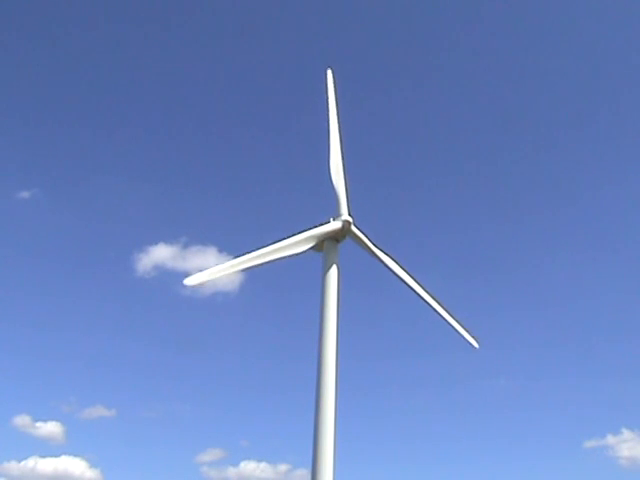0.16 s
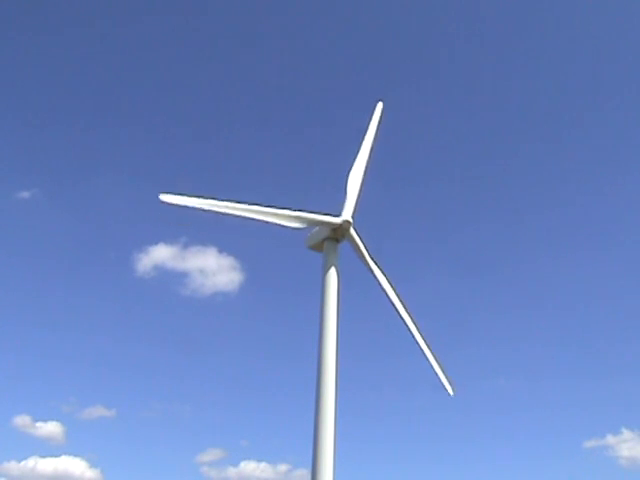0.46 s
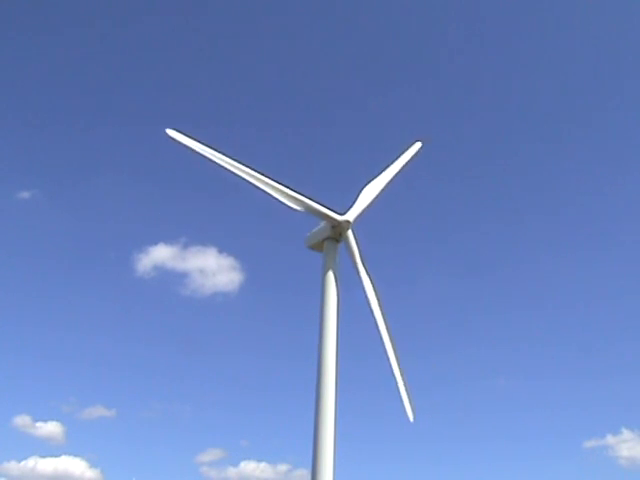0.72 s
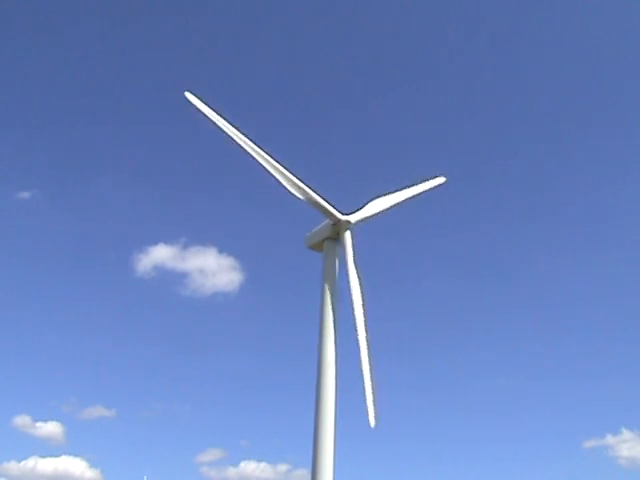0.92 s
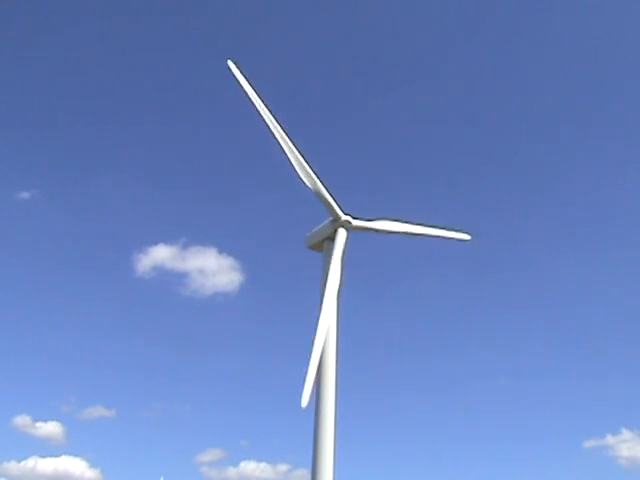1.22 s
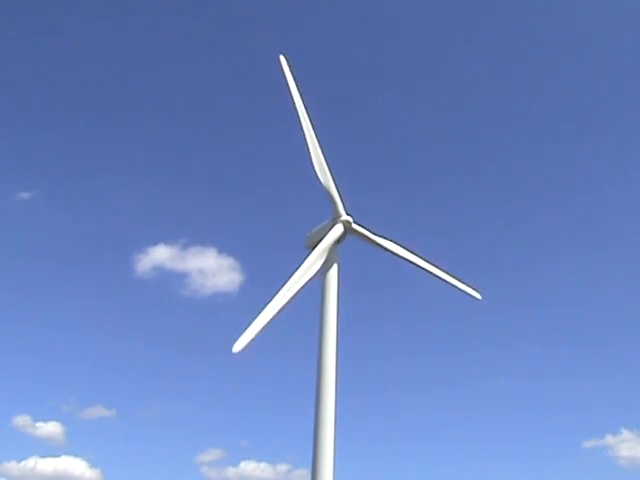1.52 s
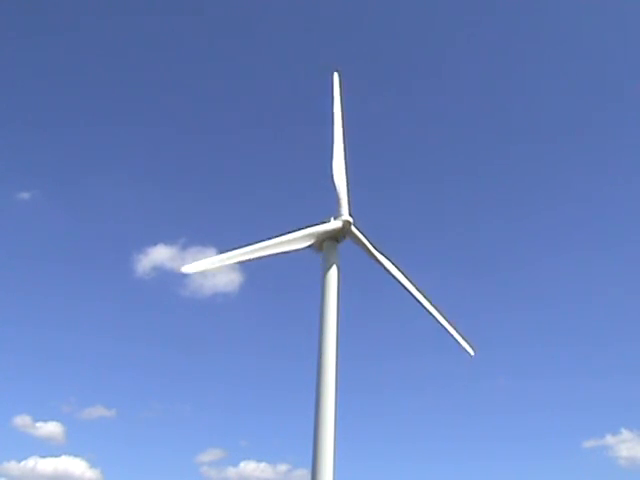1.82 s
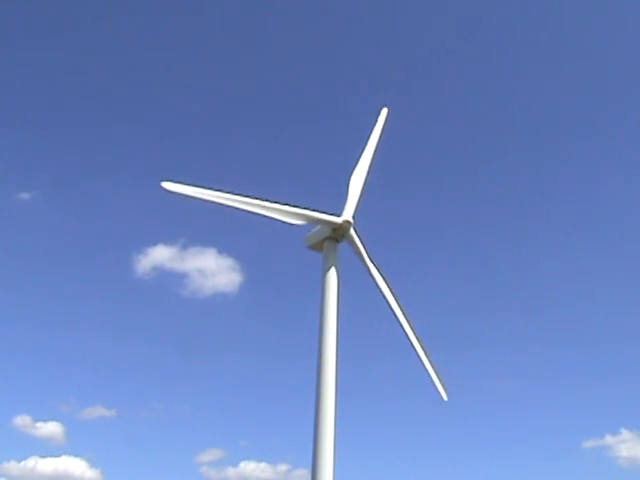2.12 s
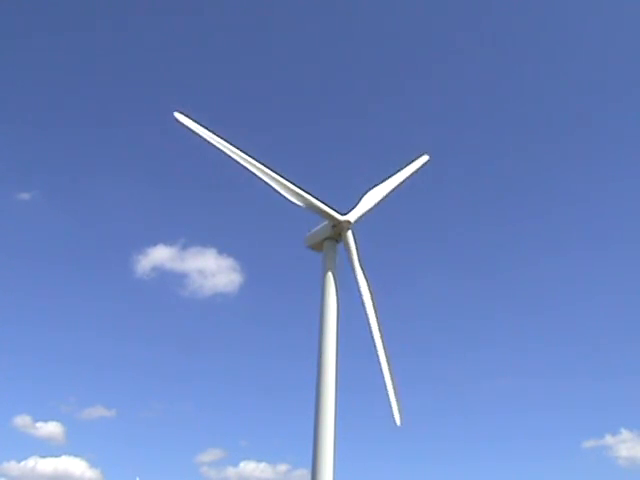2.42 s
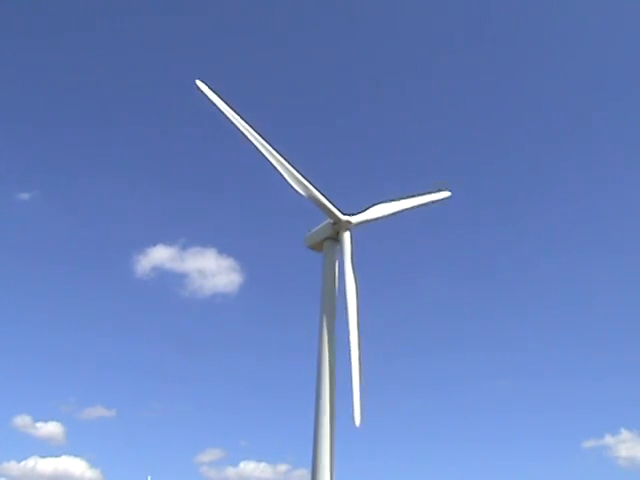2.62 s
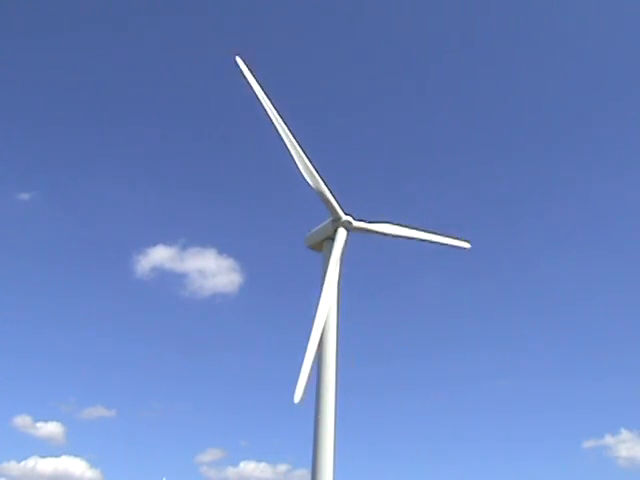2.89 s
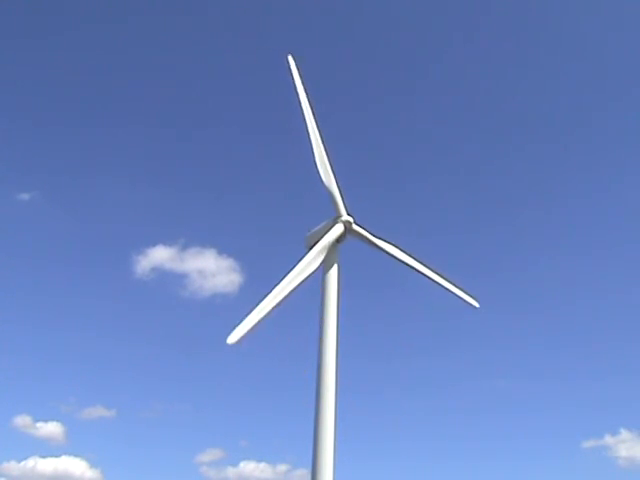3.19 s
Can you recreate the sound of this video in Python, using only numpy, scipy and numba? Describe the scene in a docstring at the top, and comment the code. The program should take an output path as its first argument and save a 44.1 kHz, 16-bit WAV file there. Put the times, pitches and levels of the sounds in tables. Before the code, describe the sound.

Wind rumbles and buffets a hand-held microphone outdoors, with sharp pops and faint bird twitters.

```python
"""Wind tumbles over a hand-held stereo microphone below a wind turbine: shaped noise rumbles, flutters,
buffets and throbs, and pressure spikes make sharp pops, one of them overloading.
A distant songbird twitters in gliding whistles, and a farther one holds a note as narrow-band noise.
Early on something close by rustles, probably clothing: grainy noise strokes and two small ticks.
Behind lie the turbine's noise rush and two steady tones, and microphone hiss with a thin electrical whine."""
import sys
import numpy as np
from scipy import signal
from scipy.fft import rfft, irfft
from scipy.io import wavfile
from scipy.ndimage import uniform_filter1d
from numba import njit

SR = 44100
rng = np.random.default_rng(int(sys.argv[2]) if len(sys.argv) > 2 else 0)


def dump(signal):
    """Clip the signal to [-1, 1] and save it as 16-bit WAV at the path in sys.argv[1]."""
    limited = np.clip(np.atleast_2d(signal).T, -1, 1)
    pcm = np.round(limited * 32767).astype(np.int16)
    wavfile.write(sys.argv[1], SR, pcm)


N = 147735  # samples

# Spectra are relative: each noise is brought to rms 1 before its level is set.
# A swell's reach is the time to each side of its centre over which it falls by a factor e^2.

# Strength of the wind's rumble and flutter, before their trims: columns t/s, level/dB
RUMBLE_LEVEL = [(0, -23.5), (.25, -32), (.7, -23.5), (1.12, -31), (1.45, -24), (2.2, -29.5), (2.65, -28.5),
                (3.0, -22), (3.35, -31)]
FLUTTER_LEVEL = [(0, -30.5), (.7, -28.5), (1.15, -31), (1.4, -27.5), (1.7, -30), (2.35, -24.5), (2.62, -33),
                 (2.78, -32), (3.0, -23.5), (3.35, -26)]
# Colours of the wind noises: columns f/Hz, level/dB (per Hz)
RUMBLE_SPECTRUM = [(15, -55), (28, -7.5), (45, -1.5), (72, 2), (170, -5), (280, -22), (600, -69)]
FLUTTER_SPECTRUM = [(60, -21.5), (130, -3), (240, -1.5), (330, -7), (450, -15.5), (700, -25.5), (1200, -38),
                    (2500, -49.5), (5000, -62)]
BUFFET_SPECTRUM = [(50, -3), (150, 1), (320, 8), (520, -2), (850, -11), (1500, -19), (2600, -31.5),
                   (8000, -64)]
# Eddies striking the ports: columns centre t/s, reach/s, level/dB
BUFFETS = [(0.694, 0.051, -20), (1.059, 0.017, -21), (1.407, 0.021, -22.5), (2.027, 0.059, -26),
           (2.341, 0.048, -19), (2.826, 0.0066, -16), (2.899, 0.09, -21.5), (2.983, 0.072, -13),
           (3.145, 0.029, -12.5), (3.223, 0.0045, -9.5)]
# Gusts that throb over the ports: columns centre t/s, reach/s, level/dB, vortex rate f/Hz
GUSTS = [(1.301, 0.021, -19, 184), (1.475, 0.17, -20, 119), (1.866, 0.1, -24, 53.6),
         (2.014, 0.047, -21, 272), (2.167, 0.089, -19, 164), (2.329, 0.1, -17, 223),
         (2.466, 0.036, -13, 98), (2.718, 0.007, -8, 133), (2.852, 0.034, -10.5, 88),
         (2.961, 0.18, -19.5, 243), (3.165, 0.079, -19, 87.6)]
# Sharp pops of wind on the ports: columns t/s, spike height before the rebound is taken off/dB
POPS = [(.332, -4), (0.4463, -8), (0.9033, -12), (1.528, -3.5), (1.8188, -5), (1.858, -5.5), (1.919, -4.5),
        (1.983, -11), (2.12, -6), (2.668, -6), (2.718, 5.5), (2.827, -5.5), (2.845, -7), (3.025, -4),
        (3.096, -5), (3.1715, -0.5)]
# Colour of the crack on the strongest pop: columns f/Hz, level/dB
CRACK_SPECTRUM = [(200, 0), (900, 0), (2000, -9), (4300, -23), (6000, -38), (16000, -49)]
# Bird notes: columns start t/s, length/s, start f/Hz, middle f/Hz, end f/Hz, level/dB
BIRD_NOTES = [(0, 0.024, 2230, 2230, 2090, -46.5), (.002, 0.031, 4180, 3750, 2440, -53),
              (0.142, 0.049, 2230, 2200, 2200, -49), (.397, 0.026, 2800, 2830, 3050, -51.5),
              (0.427, 0.022, 3920, 3800, 3400, -51.5), (0.48, 0.034, 3030, 2650, 2600, -56),
              (0.509, .042, 4080, 3930, 2970, -47.5), (0.622, 0.036, 4200, 3300, 2460, -51.5),
              (.722, 0.029, 4220, 3300, 2660, -51.5), (0.787, 0.075, 4580, 4870, 4670, -59.5),
              (.905, 0.025, 3640, 3620, 3350, -55), (0.998, 0.022, 3330, 3620, 3500, -49),
              (1.127, 0.069, 2245, 2500, 2890, -52), (1.197, 0.025, 3500, 3620, 3400, -57),
              (1.2, 0.081, 2230, 2760, 2920, -54.5), (1.221, 0.022, 5950, 5750, 5250, -54.5),
              (1.281, 0.043, 2310, 2330, 2190, -55.5), (1.632, 0.062, 2990, 2700, 2380, -50.5),
              (1.682, 0.026, 2540, 3050, 3360, -56), (1.793, 0.026, 4150, 3800, 3480, -56.5),
              (1.855, 0.032, 3620, 3630, 3300, -57.5), (1.859, 0.052, 2160, 2550, 3600, -57),
              (1.895, 0.041, 4330, 4430, 4830, -55), (1.938, 0.033, 4110, 3250, 2680, -53),
              (1.955, 0.025, 4000, 3830, 3150, -52.5), (2.039, .05, 3830, 3020, 2680, -52.5),
              (2.046, 0.05, 4270, 4130, 3620, -58), (2.067, .026, 3370, 3620, 3120, -55.5),
              (2.17, 0.031, 3500, 3580, 3020, -55.5), (2.244, 0.16, 2830, 2970, 2240, -48),
              (2.478, 0.044, 2930, 2860, 2360, -49), (3.057, .07, 4500, 4950, 4450, -59.5),
              (3.182, .036, 5050, 3900, 3200, -63), (3.33, 0.027, 4410, 4300, 4450, -55)]
# Cloth strokes: columns centre t/s, reach/s, broad hiss level/dB, ringing scuff level/dB, left over right/dB
CLOTH_STROKES = [(0.052, 0.47, -51.5, -60, 6.5), (0.187, 0.055, -62, -42, 0),
                 (0.326, 0.064, -57.5, -46, -1), (0.56, 0.18, -48, -58, 0.5), (0.945, 0.11, -55, -62, 3),
                 (1.098, 0.26, -48.5, -73, 1.5)]
# Colours of the cloth's hiss and scuff: columns f/Hz, level/dB (per Hz)
RUSTLE_SPECTRUM = [(1400, 1.5), (1800, -4.5), (2250, 2.5), (3000, -1.5), (4100, -1), (5100, -6),
                   (6200, -4.5), (8500, -11.5), (11000, -7.5), (16000, -19)]
SCUFF_SPECTRUM = [(1000, -23), (1400, 3.5), (1800, -15), (3200, -10), (3800, 3), (4300, -7), (5000, -19),
                  (6000, -15.5), (8500, -45)]
# Small ticks: columns t/s, level/dB, centre f/Hz, left over right/dB
TICKS = [(0.134, -30, 2300, 8), (0.669, -45, 8950, -1)]
# Two steady turbine tones, then a thin electrical whine in the microphone's hiss: columns f/Hz, level/dB
STEADY_TONES = [(512, -47.5), (1024, -56.5), (5922, -76), (11186, -82)]
# Colours of the turbine's rush and the microphone's hiss: columns f/Hz, level/dB (per Hz)
RUSH_SPECTRUM = [(100, 1), (450, -3.5), (800, -6), (1300, -14.5), (3000, -54)]
HISS_SPECTRUM = [(500, 4.5), (1500, 7), (3000, 2.5), (4500, -1.5), (6200, -4.5), (8700, -12.5),
                 (10700, -9.5), (13000, -19), (16000, -13)]

RUMBLE_TRIM_DB, FLUTTER_TRIM_DB = 5, 5.5
RUMBLE_PAN_DB, FLUTTER_PAN_DB = -5, 1.5  # left over right
EDDY_RATE_HZ, EDDY_DEPTH_DB = 23.3, 3.5
GUST_SKIRT_DB = -24  # an octave from the vortex rate
POP_RISE_S, POP_FALL_S = .0008, .0004
POP_REBOUND_S = 0.0022  # a shallow swing the other way surrounds each spike
CRACK_DB = -7.5

BIRD_WAVER = .004  # share by which the pitch wavers
BIRD_ECHO_DB, BIRD_ECHO_S, BIRD_PAN_DB = -14, 0.055, 3.5
TWITTER_START_S, TWITTER_END_S, TWITTER_NOTE_S = .87, 1.16, .016
TWITTER_HZ, TWITTER_SPREAD, TWITTER_DB = 3930, 0.148, -56.5  # spread: share by which the pitch varies
CALL_S, CALL_REACH_S, CALL_HZ, CALL_WIDTH_HZ, CALL_DB = 2.98, 0.16, 2810, 500, -56

TICK_DECAY_S = 0.0023
RUSH_DB, HISS_DB = -41.5, -53.5
TONE_WAVER_DB, TONE_DRIFT_RAD = 0.5, 1.93

# wind suppressor, then gain control; slopes in dB of cut per dB over the threshold
DUCK_DB, DUCK_RELEASE_S, DUCK_SLOPE, DUCK_DELAY_S = -7, 0.083, 1.8, .0015
LIMIT_DB, LIMIT_ATTACK_S, LIMIT_RELEASE_S, LIMIT_SLOPE = -14.5, 0.0042, 0.041, 0.6
TOP_HZ = 15800


def undb(db):
    """Amplitude for a level in dB."""
    return 10 ** (np.asarray(db) / 20)


def times():
    """Time of every sample in seconds."""
    return np.arange(N) / SR


def frequencies():
    """Frequency of every spectrum bin in Hz."""
    return np.arange(N // 2 + 1) * SR / N


def curve(rows):
    """Gain along a table of t/s, level/dB."""
    return undb(np.interp(times(), *np.array(rows).T))


def colour(spectrum):
    """Gain of every bin, drawn in straight dB lines over log frequency."""
    hz, db = np.array(spectrum).T
    log_hz = np.log(np.maximum(frequencies(), 1))
    return undb(np.interp(log_hz, np.log(hz), db))


def pan(db):
    """Left and right gains for a level difference, keeping their rms at 1."""
    gains = undb(np.array([[db], [-db]]) / 2)
    return gains / np.sqrt(np.mean(gains ** 2))


def walk(rate):
    """Smooth random drift with a spread of 1, rolled off around a rate in Hz."""
    f = frequencies()
    lowpass = np.exp(-(f / rate) ** 2) * (f > 0)
    drift = irfft(rfft(rng.standard_normal(N)) * lowpass, N)
    return drift / drift.std()


def noise(spectrum, likeness):
    """Stereo noise of rms 1; likeness runs from -1 (opposed) to 1 (the same in both ears)."""
    pair = irfft(rfft(rng.standard_normal((2, N))) * colour(spectrum), N)
    shares = np.sqrt([[(1 + likeness) / 2], [(1 - likeness) / 2]])
    mid, side = pair / pair.std() * shares
    return np.array([mid + side, mid - side])


def swell(centre, reach):
    """A bell-shaped rise and fall."""
    return np.exp(-2 * ((times() - centre) / reach) ** 2)


def wind():
    """Slow pressure swings rumble; faster eddies flutter and buffet, pushing the ports in mostly opposite senses."""
    eddies = undb(EDDY_DEPTH_DB * walk(EDDY_RATE_HZ))
    eddies = eddies / np.sqrt(np.mean(eddies ** 2))
    rumble = noise(RUMBLE_SPECTRUM, likeness=0.43) * curve(RUMBLE_LEVEL)
    rumble = rumble * undb(RUMBLE_TRIM_DB) * pan(RUMBLE_PAN_DB)
    flutter = noise(FLUTTER_SPECTRUM, likeness=-0.31) * curve(FLUTTER_LEVEL)
    flutter = flutter * undb(FLUTTER_TRIM_DB) * pan(FLUTTER_PAN_DB)
    strikes = sum(undb(db) * swell(s, reach) for s, reach, db in BUFFETS)
    buffets = noise(BUFFET_SPECTRUM, likeness=-0.57) * strikes
    return rumble + eddies * (flutter + buffets)


def gusts():
    """Each gust sheds vortices at its own rate: a swell of noise peaked there, a brief, roughly pitched throb."""
    throbs = 0
    for s, reach, db, hz in GUSTS:
        band = [(hz / 4, 2 * GUST_SKIRT_DB), (hz / 2, GUST_SKIRT_DB), (hz, 0),
                (hz * 2, GUST_SKIRT_DB), (hz * 20, -100)]
        throbs = throbs + noise(band, likeness=0) * undb(db) * swell(s, reach)
    return throbs


def pops():
    """Eddies burst on the ports: pressure spikes, opposite in the two channels; the strongest adds a dull crack."""
    spikes = 0
    # this share gives the rebound the same area as the spike, so the pressure balances out
    rebound_share = (POP_RISE_S + POP_FALL_S) / (2 * POP_REBOUND_S)
    for s, db in POPS:
        t = times() - s
        spike = np.exp(-(t / np.where(t < 0, POP_RISE_S, POP_FALL_S)) ** 2)
        rebound = np.exp(-(t / POP_REBOUND_S) ** 2) * rebound_share
        spikes = spikes + undb(db) * (spike - rebound)
    strongest_s = max(POPS, key=lambda row: row[1])[0]
    crack = np.roll(irfft(colour(CRACK_SPECTRUM), N), int((strongest_s + POP_FALL_S) * SR))
    # the crack pushes both channels the same way
    return spikes * np.array([[-1], [1]]) - undb(CRACK_DB) * crack / crack.max()


def bird():
    """Nearly pure whistles, each one arc of pitch, scattered a little by the field."""
    song = np.zeros(N)
    waver = 1 + BIRD_WAVER * walk(150)
    for start, length, first_hz, middle_hz, last_hz, db in BIRD_NOTES + twitter():
        u = (times() - start) / length  # progress through the note, 0 to 1
        on = (u > 0) & (u < 1)
        arc = np.polyfit([0, .5, 1], [first_hz, middle_hz, last_hz], 2)
        hz = np.polyval(arc, u[on]) * waver[on]
        envelope = np.sqrt(2 * np.sin(np.pi * u[on]))
        song[on] += undb(db) * envelope * np.sin(2 * np.pi * np.cumsum(hz) / SR)
    song = song * undb(2.3 * walk(66))  # the loudness flickers
    tail = rng.standard_normal((2, N)) * np.exp(-times() / BIRD_ECHO_S)
    tail = tail / np.sqrt(np.sum(tail[0] ** 2))
    echo = signal.fftconvolve(song[None], tail, axes=1)[:, :N]
    return song * pan(BIRD_PAN_DB) + undb(BIRD_ECHO_DB) * echo


def twitter():
    """Tiny overlapping notes at random, each sliding its own way, as rows like those of BIRD_NOTES."""
    chance = rng.uniform(-1.1, 1, size=(32, 3))
    starts = np.linspace(TWITTER_START_S, TWITTER_END_S, len(chance))
    notes = []
    for start, (when, pitch, slide) in zip(starts, chance):
        glide = pitch + slide * np.array([1, 0, -1]) / 2
        hz = TWITTER_HZ * (1 + TWITTER_SPREAD * glide)
        notes.append((start + when * TWITTER_NOTE_S / 2, TWITTER_NOTE_S, *hz, TWITTER_DB))
    return notes


def far_call():
    """One held note from a more distant bird, blurred into a narrow band of noise."""
    band = [(CALL_HZ - CALL_WIDTH_HZ, -40), (CALL_HZ, 0), (CALL_HZ + CALL_WIDTH_HZ, -40)]
    return noise(band, likeness=1) * swell(CALL_S, CALL_REACH_S) * undb(CALL_DB)


def cloth():
    """Soft grainy strokes of fabric close to the microphone: broad hiss and ringing scuff in swells."""
    hiss = noise(RUSTLE_SPECTRUM, likeness=0.82)
    scuff = noise(SCUFF_SPECTRUM, likeness=1.0)
    strokes = 0
    for s, reach, hiss_db, scuff_db, pan_db in CLOTH_STROKES:
        fabric = undb(hiss_db) * hiss + undb(scuff_db) * scuff
        strokes = strokes + swell(s, reach) * fabric * pan(pan_db)
    return strokes * undb(1.3 * walk(140))  # grain


def ticks():
    """Tiny dry contacts: noise that starts at once and dies away within milliseconds."""
    contacts = 0
    for s, db, hz, pan_db in TICKS:
        t = times() - s
        band = [(hz / 4, -25), (hz, 0), (hz * 2, -14), (hz * 4, -32)]
        decay = (t >= 0) * np.exp(-abs(t) / TICK_DECAY_S)
        contacts = contacts + noise(band, likeness=0.73) * decay * undb(db) * pan(pan_db)
    return contacts


def steady_tones(rows):
    """Sines of fixed pitch that waver in level and drift in phase."""
    tones = 0
    for hz, db in rows:
        level = undb(db + TONE_WAVER_DB * walk(14.0)) * np.sqrt(2)  # sine peak from rms
        phase = 2 * np.pi * hz * times() + TONE_DRIFT_RAD * walk(14.8)
        tones = tones + level * np.sin(phase)
    return tones


def turbine():
    """A wide, even rush of noise, with two steady gearbox tones."""
    rush = noise(RUSH_SPECTRUM, likeness=0.11) * undb(RUSH_DB + .5 * walk(5.7))
    return rush + steady_tones(STEADY_TONES[:2])


def microphone_hiss():
    """The microphone's own fine, steady hiss, with a thin electrical whine in it."""
    return noise(HISS_SPECTRUM, likeness=0.67) * undb(HISS_DB) + steady_tones(STEADY_TONES[2:])


def scene():
    """Wind on the microphone, birds, cloth, the turbine and the microphone's hiss together."""
    microphone_wind = wind() + gusts() + pops()
    birds = bird() + far_call()
    return microphone_wind + birds + cloth() + ticks() + turbine() + microphone_hiss()


@njit
def follow(x, attack, release):
    """Level follower with separate rise and fall, as shares of the gap closed per sample."""
    out, level = np.empty(len(x)), 0.
    for i in range(len(x)):
        level += (x[i] - level) * (attack if x[i] > level else release)
        out[i] = level
    return out


def record(dry):
    """A wind suppressor lets hard pops through, then briefly narrows the sound after them.
    Gain control ducks gusts, the strongest pop clips, and the top is cut."""
    mid, side = (dry[0] + dry[1]) / 2, (dry[0] - dry[1]) / 2
    peak = follow(np.abs(side), 1., 1 / (DUCK_RELEASE_S * SR))
    peak = np.roll(peak, int(DUCK_DELAY_S * SR))  # the suppressor acts a moment late
    duck = np.maximum(peak / undb(DUCK_DB), 1) ** -DUCK_SLOPE
    side = side * uniform_filter1d(duck, size=64)
    narrowed = np.array([mid + side, mid - side])

    loudest = np.abs(narrowed).max(axis=0)
    level = follow(loudest, 1 / (LIMIT_ATTACK_S * SR), 1 / (LIMIT_RELEASE_S * SR))
    cut = np.maximum(level / undb(LIMIT_DB), 1) ** LIMIT_SLOPE
    clipped = np.clip(narrowed / cut, -1, 1)
    top_cut = signal.ellip(10, .1, 80, TOP_HZ, fs=SR, output="sos")
    return signal.sosfilt(top_cut, clipped)


dry = scene()
out = record(dry)
dump(out)
```